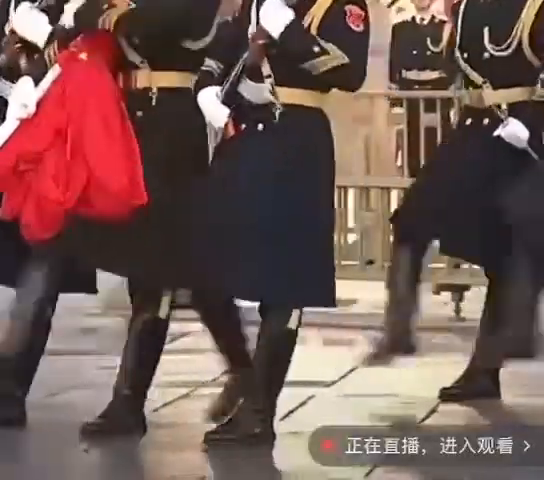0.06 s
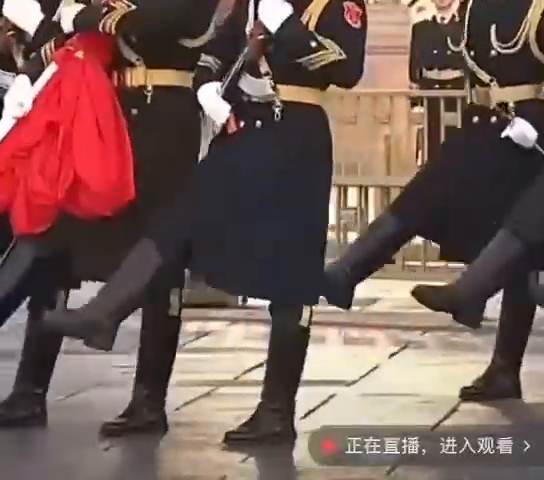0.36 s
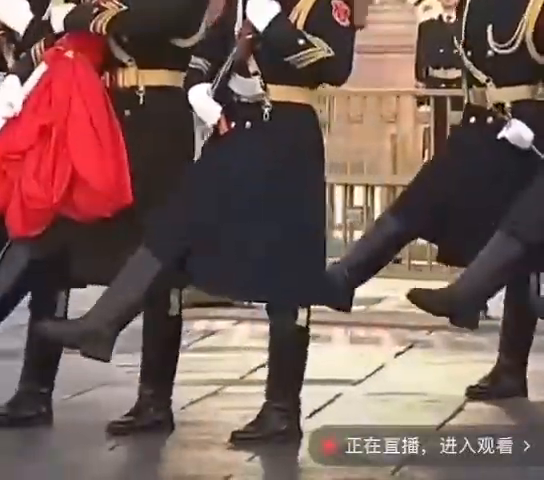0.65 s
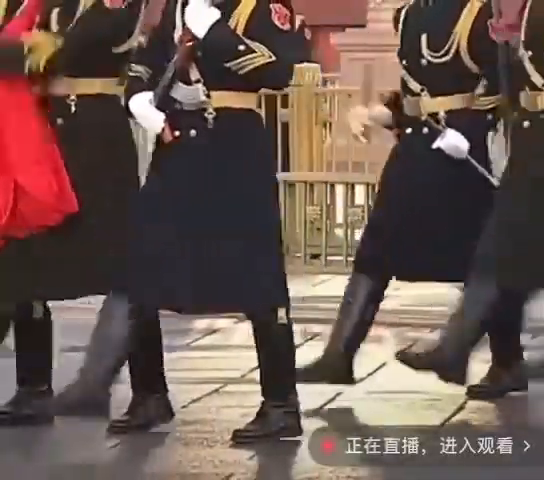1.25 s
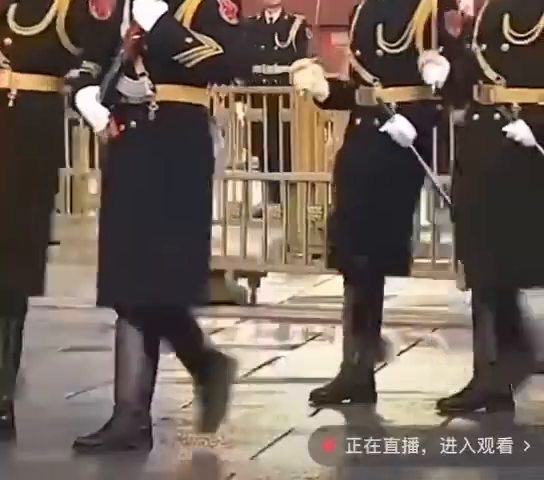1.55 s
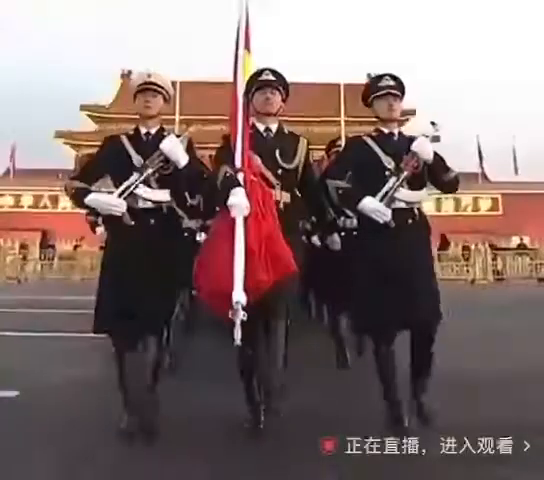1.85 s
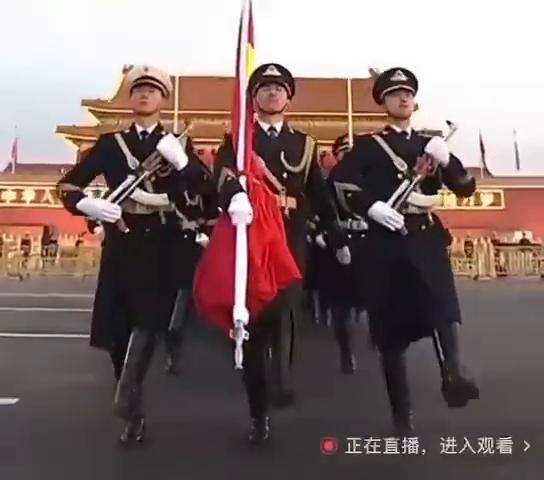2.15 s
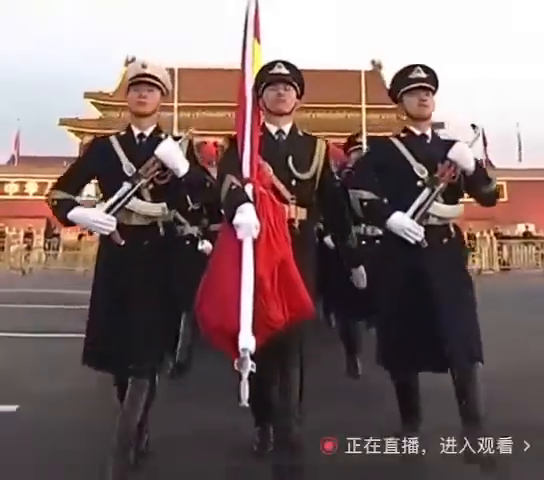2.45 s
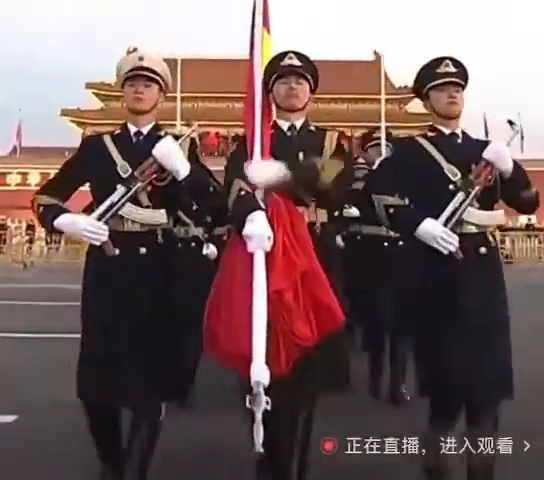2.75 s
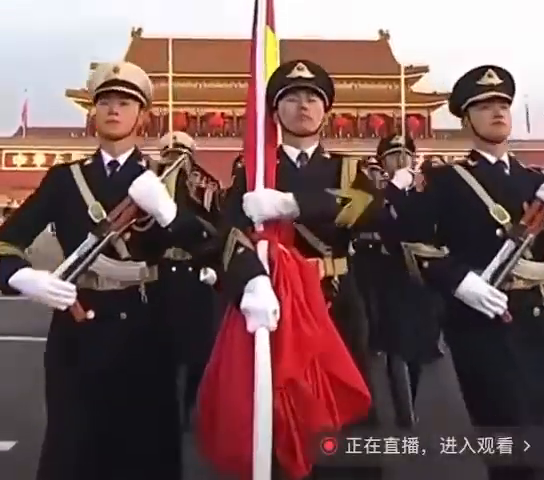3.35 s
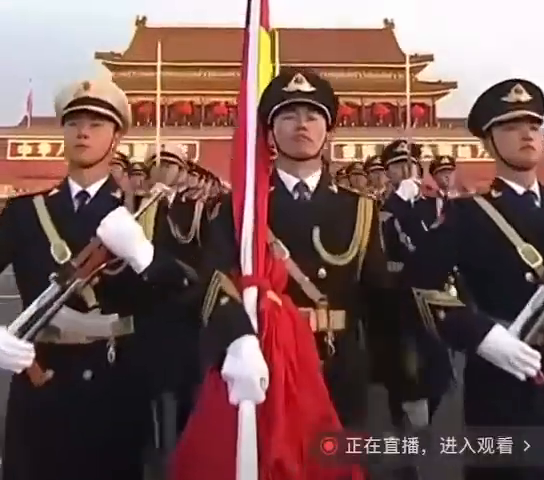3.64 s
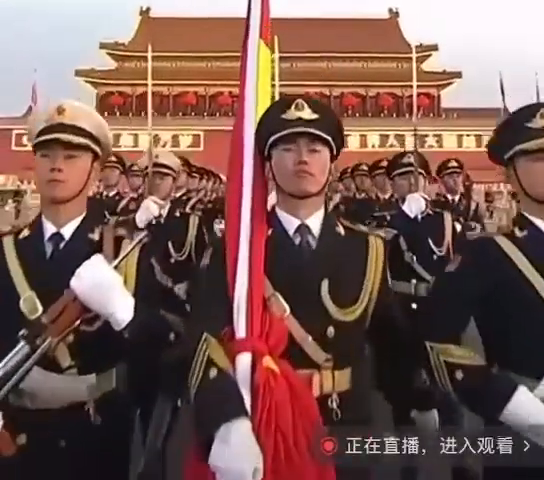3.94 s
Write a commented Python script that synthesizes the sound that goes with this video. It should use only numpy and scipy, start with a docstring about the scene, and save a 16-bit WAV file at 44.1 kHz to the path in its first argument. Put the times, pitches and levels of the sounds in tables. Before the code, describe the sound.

A marching column's boots slap down in three loud, slightly distorted volleys about a second apart. Faint cloth rustles, clinks and soft thumps fill the gaps, and the open square's rumbling background jumps louder before the last two, echoing stamps.

```python
"""A wide, wet paved square: a guard of honour goose-steps through three stamps that overload the microphone.
Each is a ragged volley of sole slaps, air cracks and heel thuds, with the rear ranks as a dense patter.
Coats swish, with bright ticks and clinks between the steps, over soft thumps and a low rumble.
The column is heard from the side, then abruptly from the front, where the square is louder and echoes."""
import sys
import numpy as np
from scipy import signal
from scipy.fft import rfft, irfft
from scipy.io import wavfile

SR = 44100
rng = np.random.default_rng(int(sys.argv[2]) if len(sys.argv) > 2 else 0)


def generate_wav(signal):
    """Clip the signal to [-1, 1] and save it as 16-bit WAV at the path in sys.argv[1]."""
    frames = np.transpose(np.atleast_2d(signal))
    scaled = np.clip(frames, -1, 1) * 32767
    pcm = np.round(scaled).astype(np.int16)
    wavfile.write(sys.argv[1], SR, pcm)


N = 176400
TIME = np.arange(N) / SR
FRONT_FROM_S = 1.80
FRONT = TIME >= FRONT_FROM_S


def from_db(db):
    """Decibels to gain."""
    return 10 ** (np.asarray(db) / 20)


def level(rows):
    """Gain along a curve of (s, dB)."""
    return from_db(np.interp(TIME, *np.transpose(rows)))


def decay(start, t60):
    """Envelope that jumps to 1 and falls 60 dB per t60 seconds."""
    out, first = np.zeros(N), int(max(start, 0) * SR)
    t = TIME[:min(N - first, int(2 * t60 * SR))]
    out[first:first + len(t)] = from_db(-60 * t / t60)
    return out


def ring(start, hz, t60):
    """A struck mode."""
    return decay(start, t60) * np.sin(2 * np.pi * hz * (TIME - start))


def colour(x, points):
    """Minimum-phase filter through (Hz, dB) points; white noise keeps its power."""
    size = 2 * N
    hz, db = np.transpose(points)
    bin_hz = np.arange(N + 1) * SR / size
    gain = from_db(np.interp(np.log(bin_hz + 1), np.log(hz), db))
    cepstrum = irfft(np.log(gain / np.sqrt(np.mean(gain ** 2))))
    cepstrum[1:N] *= 2
    cepstrum[N + 1:] = 0
    return irfft(rfft(x, size) * np.exp(rfft(cepstrum)))[:N]


def noise():
    """White noise, unit variance."""
    return rng.standard_normal(N)


def drift(rate_hz):
    """Smooth random wander, unit variance."""
    pole = np.exp(-2 * np.pi * rate_hz / SR)
    slow = signal.lfilter([1], [1, -2 * pole, pole * pole], rng.standard_normal(N + SR))[SR:]
    return slow / slow.std()


# Nearest boots landing. Each row: start in seconds, sole slap in dB, heel thud in dB.
BOOTS = [(1.319, -26, -26), (1.3368, -16, -38), (1.3408, -12.5, -18), (1.345, -15, -30), (1.351, -9.5, -14),
         (1.365, -12, -30), (1.3729, -4.5, -18), (1.376, -1.5, -26), (1.381, -2.5, -16), (1.387, -2, -23),
         (1.394, 0, -2.5), (1.405, -8, -29), (1.412, -8.5, -19), (1.418, -12, -17), (1.436, -11.5, -31),
         (1.4437, -11.5, -19), (2.520, -2, -23), (2.526, -2, -17), (2.5316, -1, -24), (2.543, -1, -5.5),
         (2.55, -0.5, -1), (2.554, -6, -21), (2.561, 1, -0.5), (2.583, -15, -6.5), (2.5967, -14, -6),
         (2.601, -26, -3), (2.624, -40, -12), (3.4862, -2.5, -18), (3.491, -1, -10.5), (3.498, -9, -9),
         (3.5022, -6.5, -4), (3.511, -9, -5.5), (3.518, -6, -12), (3.531, -17, -3), (3.5409, -13, -6.5),
         (3.550, -14, -5.5), (3.565, -21, -9)]
# Slap spectra from the side and the front. Each row: frequency in Hz, relative level in dB.
SLAP_SIDE_SPECTRUM = [(60, -16), (200, 2), (500, 7), (1300, -3.5), (2200, -6.5), (4000, -11.5),
                      (6000, -18.5), (10000, -21), (12000, -30)]
SLAP_FRONT_SPECTRUM = [(60, -42), (200, 7), (500, 4), (1200, 1), (2000, -6.5), (3000, -7), (5000, -15),
                       (8000, -25.5), (12000, -37.5)]

def sole_slaps(side_t60_s=0.034, front_t60_s=0.025, grit_db=2):
    """Each sole smacks the wet stone in a short, gritty burst."""
    power = sum((from_db(db) * decay(start, front_t60_s if start > FRONT_FROM_S else side_t60_s)) ** 2
                for start, db, _ in BOOTS)
    grit = noise() * from_db(grit_db * drift(rate_hz=430))
    burst = np.sqrt(power) * grit / grit.std()
    return colour(burst * ~FRONT, SLAP_SIDE_SPECTRUM) + colour(burst * FRONT, SLAP_FRONT_SPECTRUM)


# Modes of heel and boot leg. Each row: frequency in Hz, relative level in dB, T60 in seconds.
BOOT_MODES = [(97.8, -10.5, 0.16), (145, -5.5, 0.087), (206.5, -2.5, 0.037), (300, -2, 0.046),
              (436, -6.5, 0.051)]

def heel_thuds(detune=0.071):
    """Each heel rings the boot's low modes, every boot tuned a little differently."""
    out, t = np.zeros(N + SR), TIME[:SR // 4]
    for start, _, db in BOOTS:
        first = int(start * SR)
        for hz, mode_db, t60 in BOOT_MODES:
            offset, polarity = rng.standard_normal(2)
            wave = np.sign(polarity) * np.sin(2 * np.pi * hz * np.exp(detune * offset) * t)
            out[first:first + len(t)] += from_db(db + mode_db - 60 * t / t60) * wave
    return out[:N]


# Sole cracks. Each row: start in seconds, frequency in Hz, level in dB.
CRACKS = [(1.32, 3570, -20), (1.346, 7500, -16), (2.521, 2630, -1), (2.526, 2960, -2.5), (2.532, 1760, 2),
          (3.491, 3200, -4), (3.498, 4700, -6), (3.5309, 2780, -0.5), (3.5406, 2200, -0.5)]

def air_cracks(t60_s=0.0057):
    """Air squeezed from under a flat sole gives a very short, pitched crack."""
    return sum(from_db(db) * ring(start, hz, t60_s) for start, hz, db in CRACKS)


# Rear volleys. Each row: peak time in seconds, level in dB, rise in seconds, fall T60 in seconds.
RANKS = [(1.394, -16, 0.08, 0.3), (2.552, -19, 0.041, 0.4), (3.514, -13.5, 0.023, 0.17)]
# Their spectrum. Each row: frequency in Hz, relative level in dB.
PATTER_SPECTRUM = [(40, -26), (90, -9), (170, 6.5), (400, 1.5), (900, -3), (1500, -4), (3000, -16.5),
                   (6000, -21.5), (12000, -38)]

def rear_ranks(impacts_per_s=1200, blur_gain=1.21):
    """Many farther boots land around the same instant, duller and blurred together."""
    swell = np.zeros(N)
    for peak, db, rise, t60 in RANKS:
        ramp = np.maximum(1 + (TIME - peak) / rise, 0)
        swell += from_db(db) * np.where(TIME < peak, ramp, decay(peak, t60))
    impacts = (rng.random(N) < impacts_per_s / SR) * noise()
    patter = impacts / impacts.std() + blur_gain * noise()
    return colour(swell * patter, PATTER_SPECTRUM)


# Reverberation of the square. Each row: band centre in Hz, relative level in dB, T60 in seconds.
REVERB_BANDS = [(107, -10, 0.38), (247, -43, 0.45), (610, -19.5, 0.57), (1320, -30.5, 1), (2900, -20, 0.65),
                (8500, -19.5, 0.44)]

def square_reverb(stamps, build_s=0.017, side_db=-2, front_db=2):
    """Diffuse reflections build up and die away, band by band."""
    response = np.zeros(N)
    for hz, db, t60 in REVERB_BANDS:
        band_pass = signal.butter(2, [hz / 1.55, hz * 1.55], "band", fs=SR, output="sos")
        band = signal.sosfilt(band_pass, noise())
        envelope = decay(0, t60) * (1 - np.exp(-TIME / build_s))
        response += from_db(db) * band * envelope / np.sqrt(np.sum(envelope ** 2))
    send = stamps * from_db(np.where(FRONT, front_db, side_db))
    return signal.fftconvolve(send, response)[:N]


# Wall echoes. Each row: delay in seconds, gain in dB.
ECHOES = [(0.128, -21.5), (0.263, -31.5)]
# Their spectrum. Each row: frequency in Hz, relative level in dB.
ECHO_SPECTRUM = [(80, -5.5), (450, -4.5), (750, 0), (1400, -5.5), (6000, -8), (12000, -28)]

def wall_echoes(stamps, smear_s=0.023):
    """Distant walls return the stamps dull and smeared, heard only from the front."""
    response = np.zeros(N)
    for delay, db in ECHOES:
        smear = noise() * np.exp(-((TIME - delay) / smear_s) ** 2)
        response += from_db(db) * smear / np.sqrt(np.sum(smear ** 2))
    echo = signal.fftconvolve(stamps * FRONT, response)[:N]
    dull = colour(echo, ECHO_SPECTRUM)
    return dull * echo.std() / dull.std()


# Ticks. Each row: start in seconds, level in dB.
# Those near 1.8 s are an earlier stamp's tail, entering abruptly with the front position.
TICKS = [(0.2784, -47), (0.313, -50), (.8126, -58), (1.8, -43), (1.811, -42), (1.823, -37.5),
         (2.286, -36.5), (2.31, -43), (2.38, -35), (2.7381, -26), (3.736, -42), (3.9267, -36.5)]
# Their spectrum. Each row: frequency in Hz, relative level in dB.
TICK_SPECTRUM = [(500, -14), (1500, 10.5), (2800, 7.5), (6500, 1), (12000, -12)]
# Clinks. Each row: start in seconds, frequency in Hz, level in dB, T60 in seconds.
CLINKS = [(.054, 5400, -51, 0.09), (0.2745, 2060, -44, 0.038), (.313, 4600, -50, 0.05),
          (2.2842, 2546, -30.5, 0.11), (2.378, 5600, -41, 0.029), (2.7369, 3900, -37, 0.036)]

def ticks_and_clinks(tick_t60_s=0.033):
    """Short bright ticks of noise, and small metal parts that ring on one note."""
    envelope = sum(from_db(db) * decay(start, tick_t60_s) for start, db in TICKS)
    clinks = sum(from_db(db) * ring(start, hz, t60) for start, hz, db, t60 in CLINKS)
    return colour(envelope * noise(), TICK_SPECTRUM) + clinks


# Cloth swish spectrum. Each row: frequency in Hz, relative level in dB.
CLOTH_SPECTRUM = [(500, -1), (1500, 10.5), (2800, 5), (5000, 1.5), (7000, -3), (10000, -4), (12000, -16)]
# Coat movement. Each row: time in seconds, level in dB.
CLOTH_LEVEL = [(0, -50), (.16, -62), (.29, -59.5), (.55, -63), (.73, -71), (.85, -71), (1.02, -74.5),
               (1.2, -70.5), (1.28, -56.5), (1.82, -62), (2.1, -67), (2.8, -53.5), (3.3, -60.5), (4, -54.5)]
FLUTTER_HZ = 22

def coats(flutter_db=1.8):
    """Heavy greatcoat cloth rubs unevenly as the legs swing."""
    rub = noise() * level(CLOTH_LEVEL) * from_db(flutter_db * drift(FLUTTER_HZ))
    return colour(rub, CLOTH_SPECTRUM)


def jingles(clicks_per_s=700, low_hz=3343, high_hz=9450, t60_s=0.012, range_db=18, re_cloth_db=-7):
    """Sling swivels and buttons click in faint clumps at random pitches, stronger as the coats move."""
    clicks, t = np.zeros(N + SR), TIME[:SR // 50]
    for when, pitch, softness in rng.random((int(clicks_per_s * N / SR), 3)):
        first = int(when * N)
        hz = low_hz * (high_hz / low_hz) ** pitch
        envelope = from_db(-range_db * softness - 60 * t / t60_s)
        clicks[first:first + len(t)] += envelope * np.sin(2 * np.pi * hz * t) / hz
    clumps = clicks[:N] * from_db(3 * drift(FLUTTER_HZ))
    return clumps / clumps.std() * from_db(re_cloth_db) * level(CLOTH_LEVEL)


# Strap slides. Each row: peak time in seconds, level in dB.
RUSTLES = [(0.845, -66), (0.895, -62), (2.79, -50)]

def strap_rustles(half_width_s=0.019, above_hz=4500):
    """Straps slide over cloth with a thin, bright rustle."""
    swell = sum(from_db(db) * np.exp(-((TIME - peak) / half_width_s) ** 2) for peak, db in RUSTLES)
    high_pass = signal.butter(2, above_hz, "high", fs=SR, output="sos")
    return signal.sosfilt(high_pass, swell * noise())


# Sole scuff. Each row: peak time in seconds, level in dB, half-width in seconds.
SCUFFS = [(2.253, -39, 0.063)]
# Its spectrum. Each row: frequency in Hz, relative level in dB.
SCUFF_SPECTRUM = [(500, -20), (1050, 3), (1450, 4), (1750, -4), (2600, -20), (8000, -50)]

def sole_scuff():
    """A sole rubs the paving in a soft rasp that swells and fades."""
    swell = sum(from_db(db) * np.exp(-((TIME - peak) / width) ** 2) for peak, db, width in SCUFFS)
    return colour(swell * noise(), SCUFF_SPECTRUM)


# Low thumps. Each row: start in seconds, level in dB.
THUMPS = [(0.07, -41), (0.567, -40), (0.706, -30), (1.089, -30), (1.161, -37), (2.412, -22.5), (3.192, -34),
          (3.758, -24)]
# Their modes. Each row: frequency in Hz, relative level in dB, T60 in seconds.
THUMP_MODES = [(60.3, 1.5, 0.21), (83.5, -2, 0.058), (136, -13.5, 0.13), (203, -12.5, 0.14)]

def thumps(rise_s=0.0043, detune=0.071):
    """Soft, muffled bumps in the bass between the stamps."""
    out = np.zeros(N)
    for start, db in THUMPS:
        attack = 1 - np.exp(-np.maximum(TIME - start, 0) / rise_s)
        for hz, mode_db, t60 in THUMP_MODES:
            detuned_hz = hz * np.exp(detune * rng.standard_normal())
            out += from_db(db + mode_db) * ring(start, detuned_hz, t60) * attack
    return out


# Background spectra. Each row: frequency in Hz, relative level in dB.
RUMBLE_SPECTRUM = [(20, -14), (45, -3), (75, 0.5), (130, -3.5), (220, -12), (1000, -62.5)]
WASH_SIDE_SPECTRUM = [(80, -1), (200, 2), (480, -5), (750, -5.5), (1100, -9.5), (1700, -18), (2600, -28.5),
                      (6000, -34), (12000, -41)]
WASH_FRONT_SPECTRUM = [(80, 0.5), (230, 3.5), (450, -0.5), (800, -5.5), (1400, -10), (2000, -18.5),
                       (3200, -24), (5500, -33.5), (9000, -38.5), (12000, -40)]
# Background envelopes. Each row: time in seconds, level in dB.
RUMBLE_LEVEL = [(0, -45.5), (.2, -50), (1.25, -49.5), (1.79, -45), (2.08, -36.5), (2.2, -28.5),
                (2.34, -35.5), (2.44, -28), (2.9, -36.5), (3.2, -26.5), (3.33, -34), (3.8, -33.5), (4, -38)]
WASH_SIDE_LEVEL = [(0, -44.5), (.09, -45), (.16, -50), (.6, -53), (1.0, -53.5), (1.3, -53), (1.8, -46.5)]
WASH_FRONT_LEVEL = [(1.8, -29), (1.92, -32), (2.1, -37.5), (2.24, -35), (2.45, -34.5), (2.8, -29.5),
                    (3.05, -36), (3.4, -38), (3.85, -33), (4, -37)]

def ambience(lumps_db=2.5, lumps_hz=3.8):
    """Lumpy low rumble under the distant wash of the square."""
    rumble = colour(noise(), RUMBLE_SPECTRUM) * level(RUMBLE_LEVEL) * from_db(lumps_db * drift(lumps_hz))
    side = colour(noise(), WASH_SIDE_SPECTRUM) * level(WASH_SIDE_LEVEL)
    front = colour(noise(), WASH_FRONT_SPECTRUM) * level(WASH_FRONT_LEVEL)
    return rumble + np.where(FRONT, front, side)


# Drone spectrum. Each row: frequency in Hz, relative level in dB.
DRONE_SPECTRUM = [(300, -30), (660, -0.5), (850, -1.5), (1000, -16), (1800, -41.5)]
# Its envelope. Each row: time in seconds, level in dB.
DRONE_LEVEL = [(.5, -69), (.85, -57.5), (1.2, -58), (1.4, -70)]

def far_drone():
    """A far-off, narrow band of noise swells before the first stamp."""
    return colour(noise(), DRONE_SPECTRUM) * level(DRONE_LEVEL)


def scene():
    """Stamps and their reflections, small sounds and background, in mono."""
    stamps = sole_slaps() + air_cracks() + heel_thuds() + rear_ranks()
    small_sounds = ticks_and_clinks() + jingles() + strap_rustles() + coats()
    drone = far_drone()
    reflections = square_reverb(stamps) + wall_echoes(stamps)
    return (stamps + reflections + small_sounds + sole_scuff() + thumps() + drone + ambience())[None]


def record(dry):
    """The stamps saturate the microphone, sooner from the side, then clip; the top is cut."""
    cutoff_hz, full_scale = 12500, 0.96
    ceiling = np.where(FRONT, 1.15, 0.65)
    low_pass = signal.cheby2(14, 45, cutoff_hz, fs=SR, output="sos")
    saturated = signal.sosfiltfilt(low_pass, ceiling * np.tanh(dry / ceiling))
    return signal.sosfiltfilt(low_pass, np.clip(saturated, -full_scale, full_scale))


dry = scene()
out = record(dry)
generate_wav(out)
```